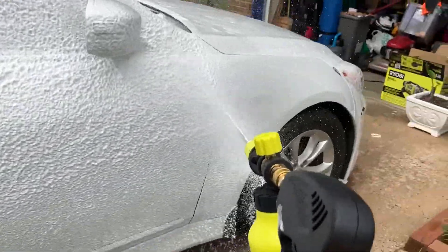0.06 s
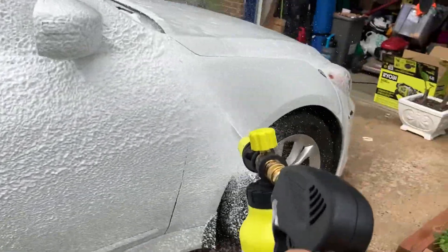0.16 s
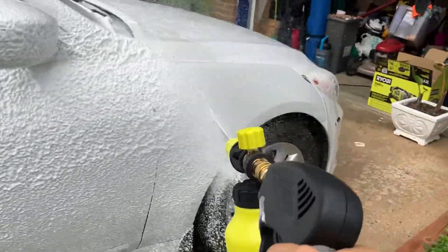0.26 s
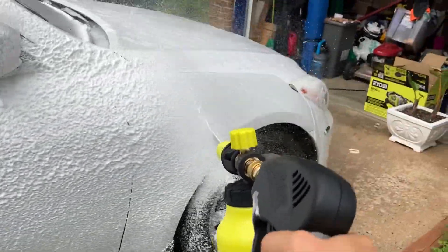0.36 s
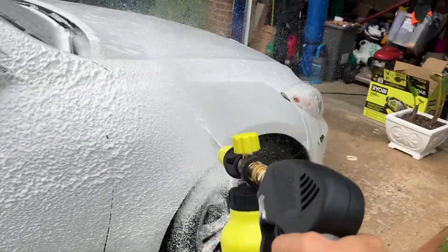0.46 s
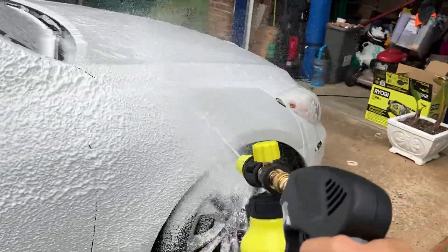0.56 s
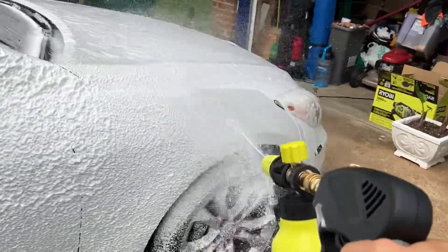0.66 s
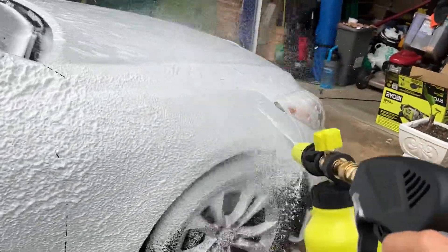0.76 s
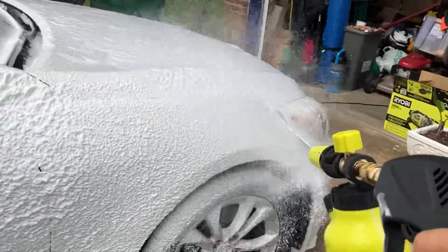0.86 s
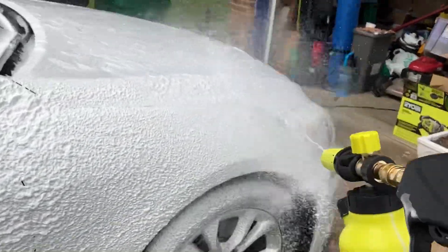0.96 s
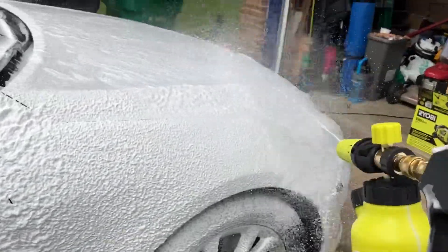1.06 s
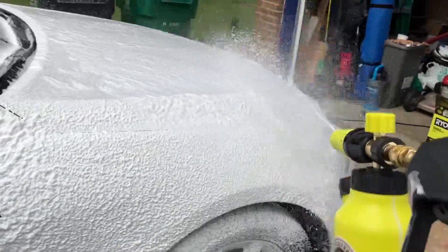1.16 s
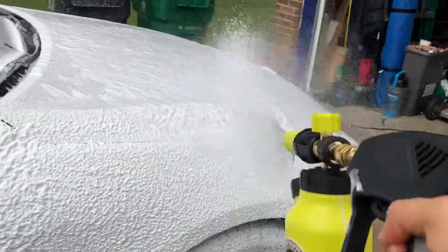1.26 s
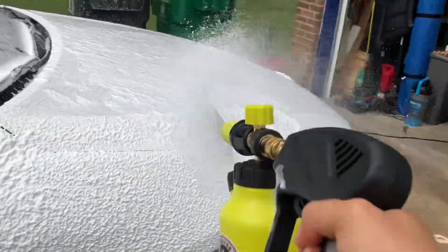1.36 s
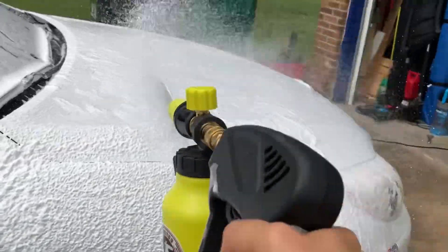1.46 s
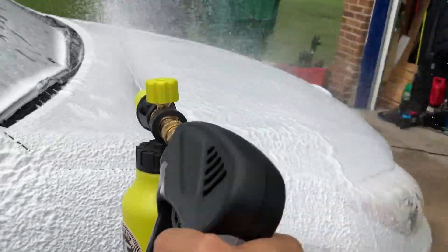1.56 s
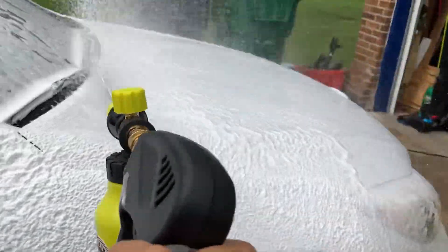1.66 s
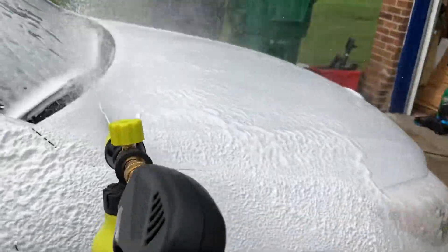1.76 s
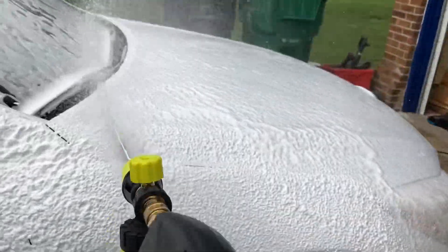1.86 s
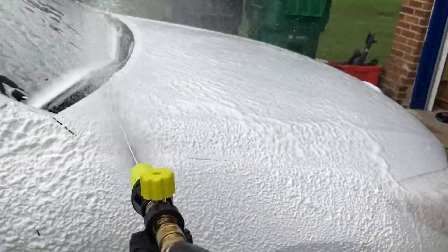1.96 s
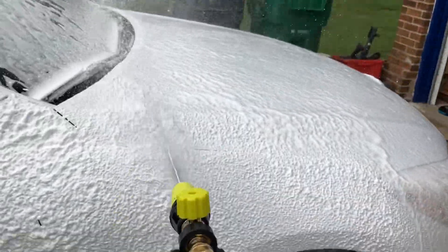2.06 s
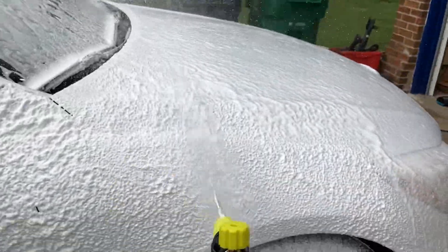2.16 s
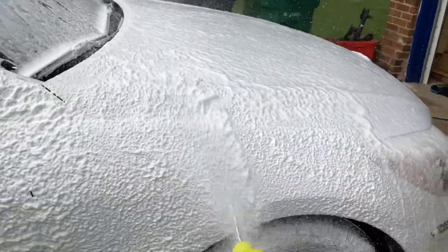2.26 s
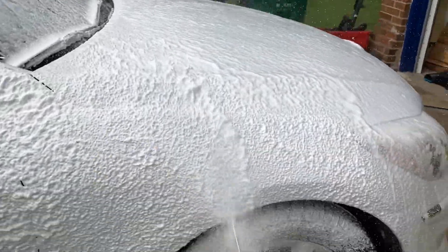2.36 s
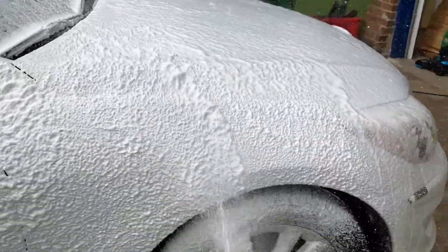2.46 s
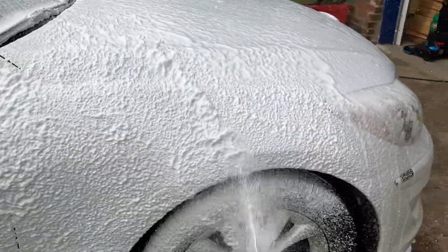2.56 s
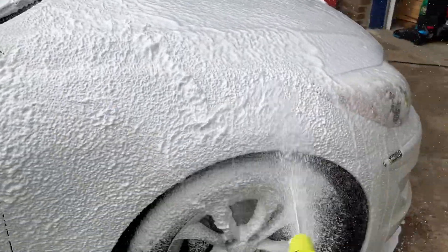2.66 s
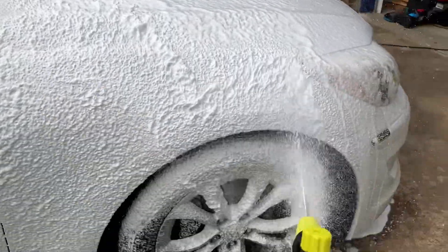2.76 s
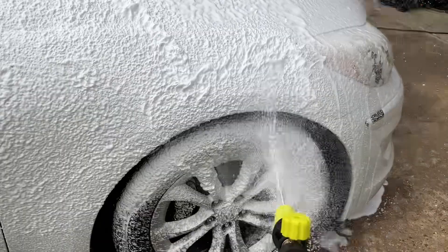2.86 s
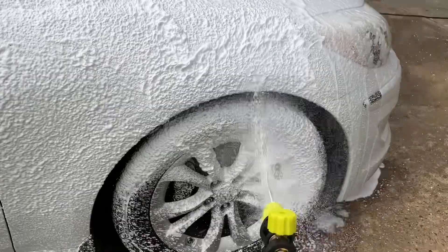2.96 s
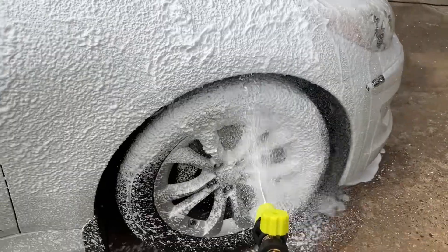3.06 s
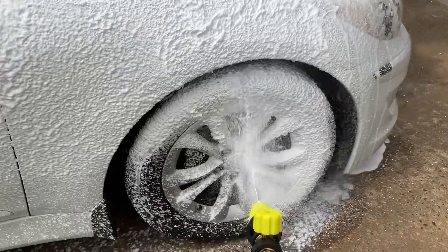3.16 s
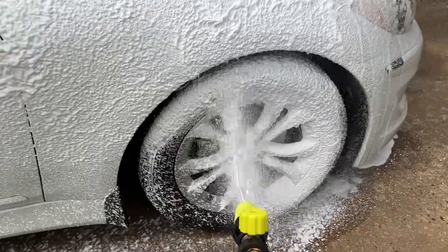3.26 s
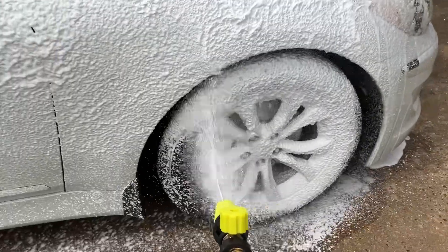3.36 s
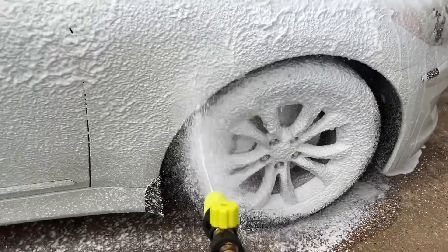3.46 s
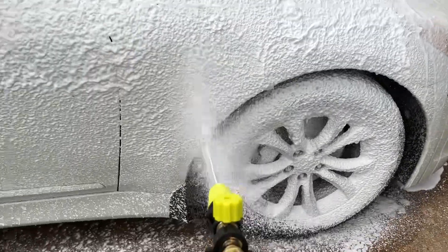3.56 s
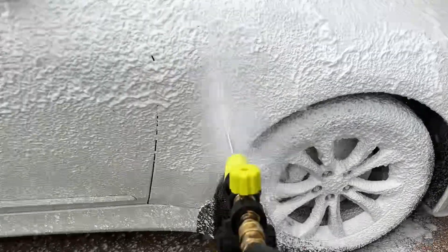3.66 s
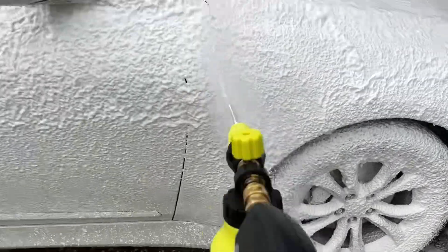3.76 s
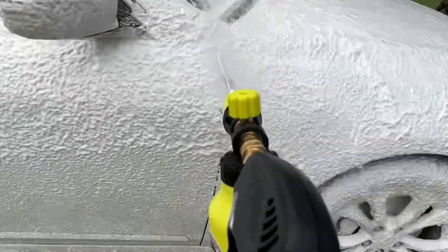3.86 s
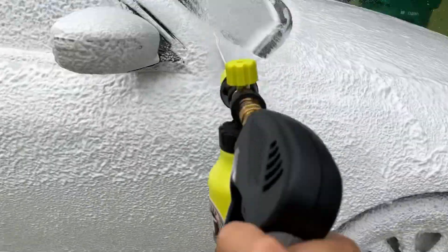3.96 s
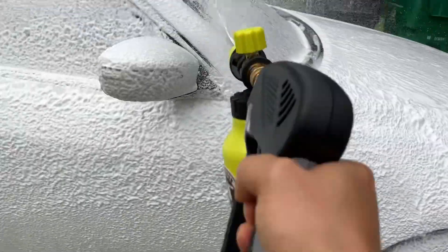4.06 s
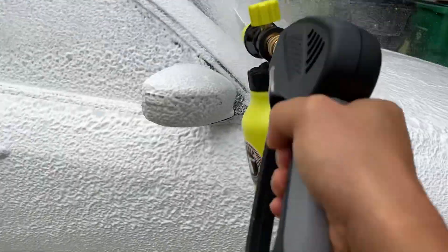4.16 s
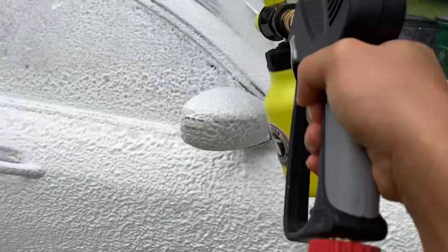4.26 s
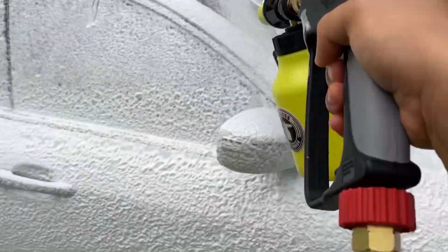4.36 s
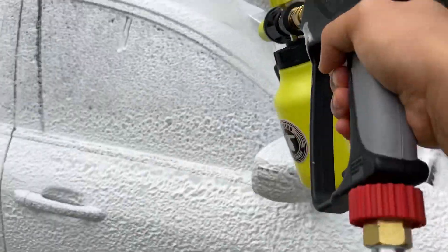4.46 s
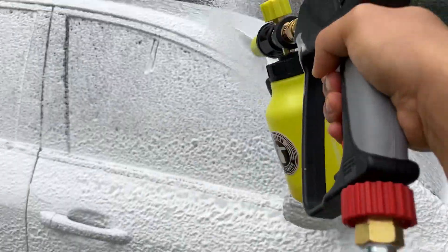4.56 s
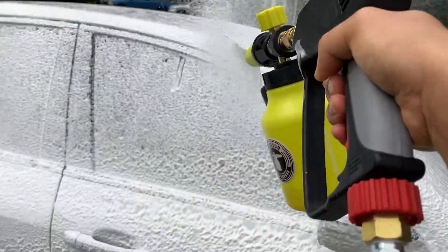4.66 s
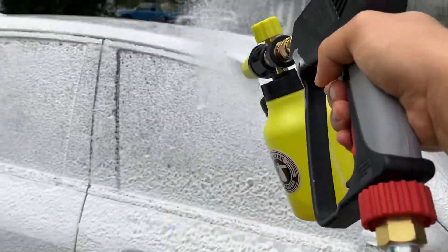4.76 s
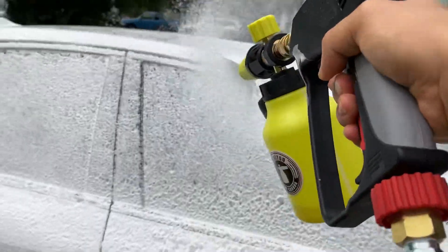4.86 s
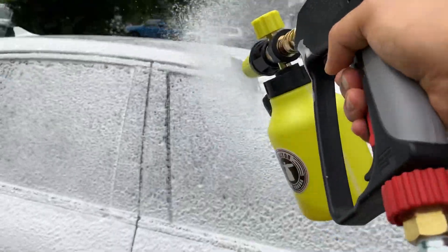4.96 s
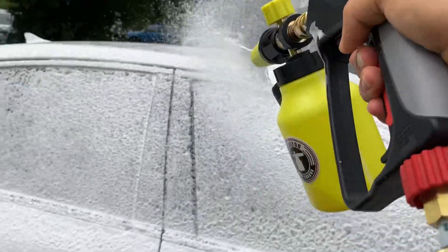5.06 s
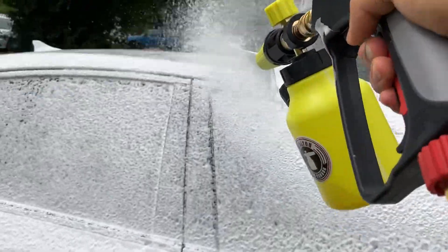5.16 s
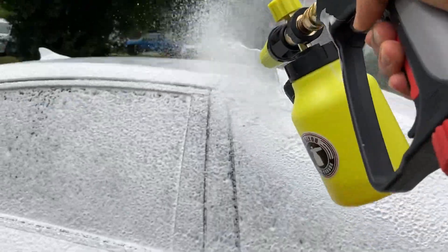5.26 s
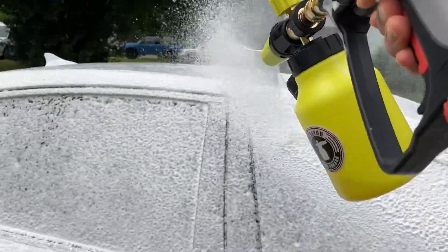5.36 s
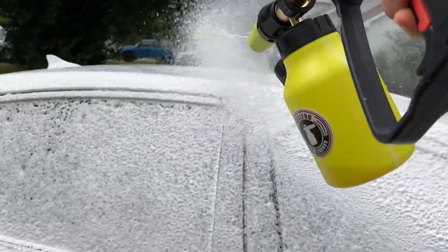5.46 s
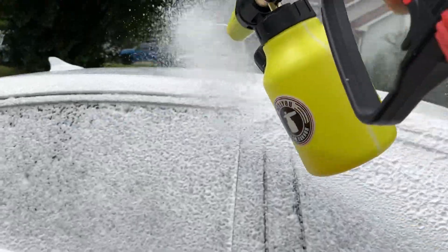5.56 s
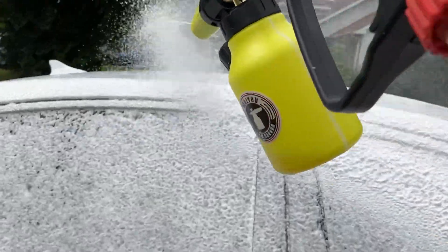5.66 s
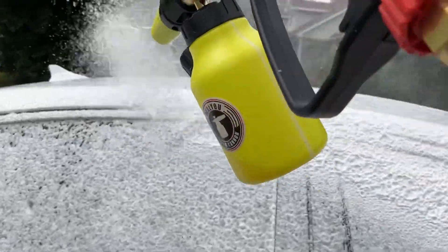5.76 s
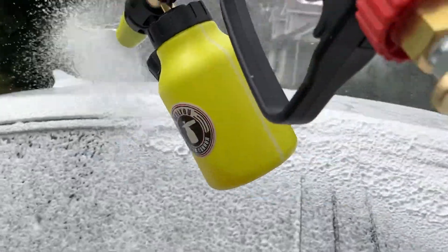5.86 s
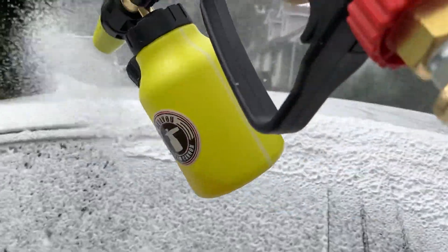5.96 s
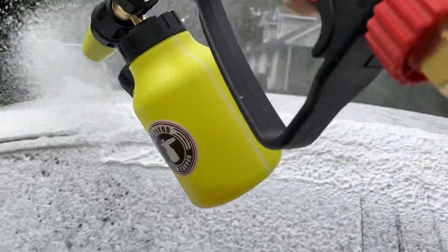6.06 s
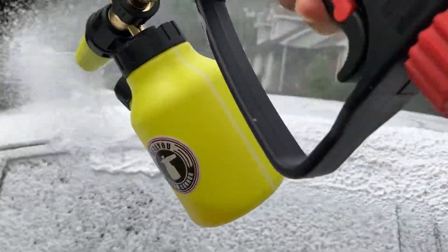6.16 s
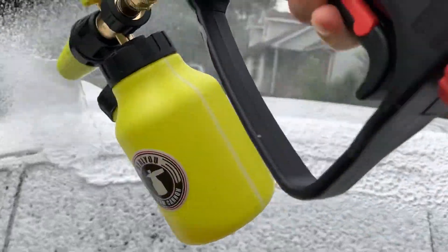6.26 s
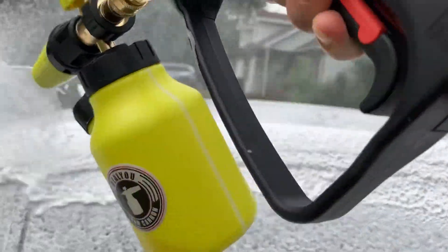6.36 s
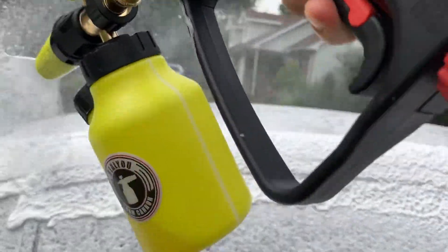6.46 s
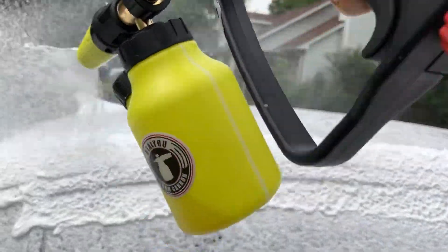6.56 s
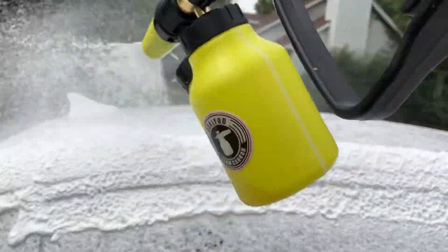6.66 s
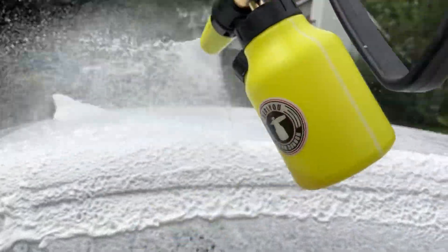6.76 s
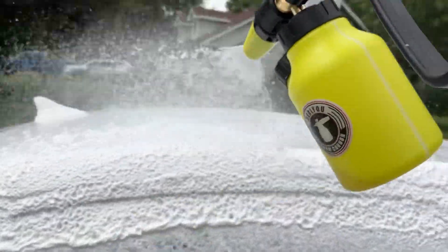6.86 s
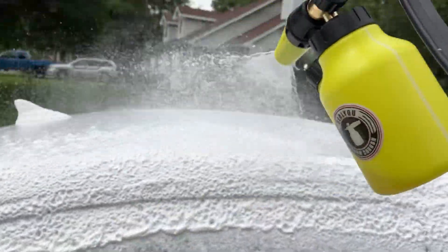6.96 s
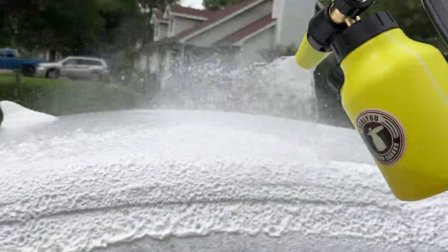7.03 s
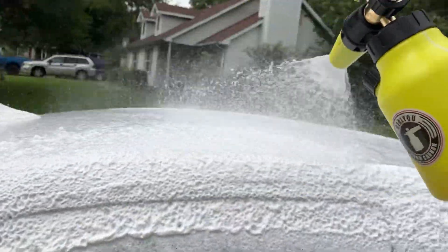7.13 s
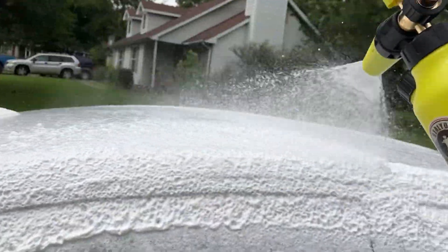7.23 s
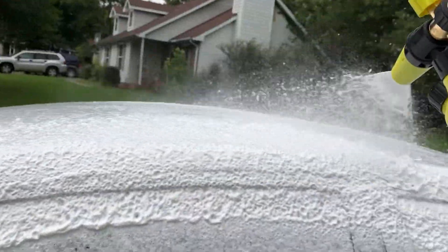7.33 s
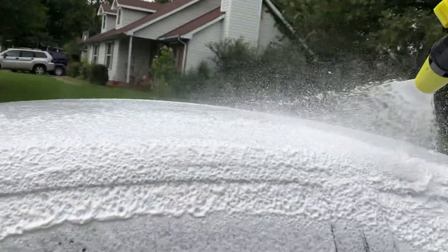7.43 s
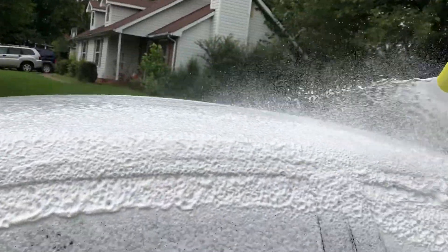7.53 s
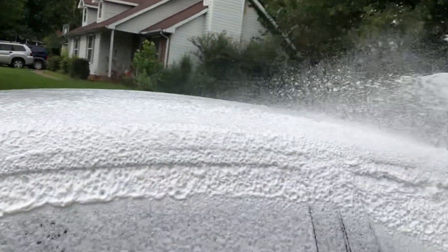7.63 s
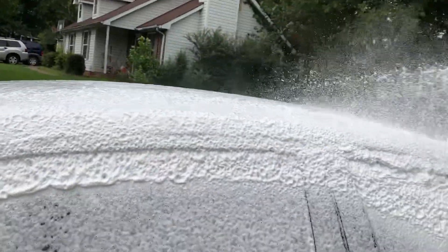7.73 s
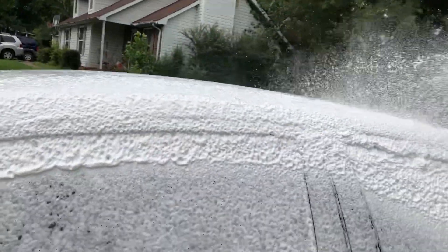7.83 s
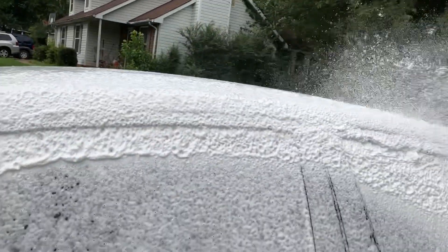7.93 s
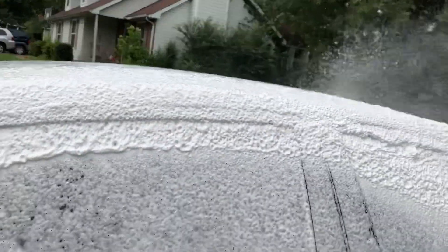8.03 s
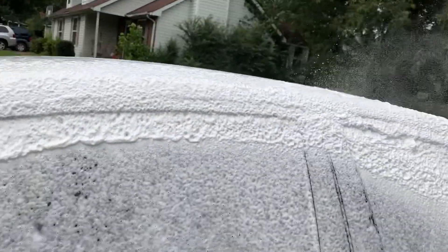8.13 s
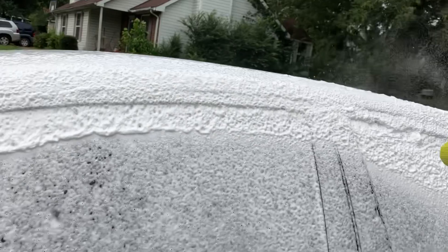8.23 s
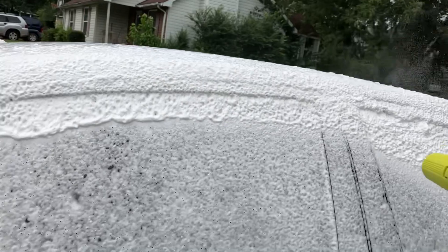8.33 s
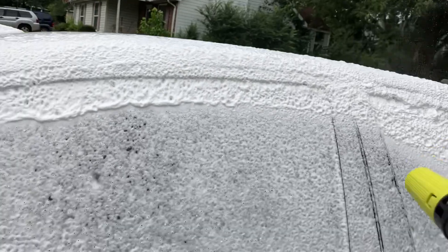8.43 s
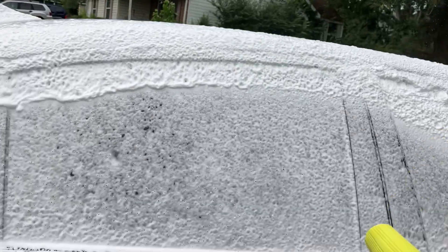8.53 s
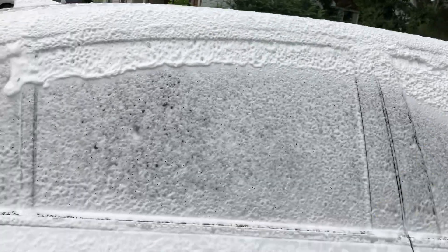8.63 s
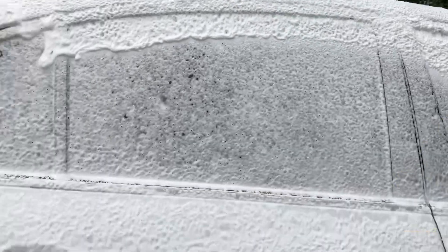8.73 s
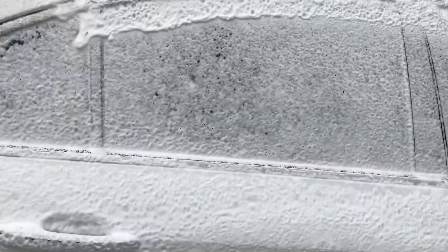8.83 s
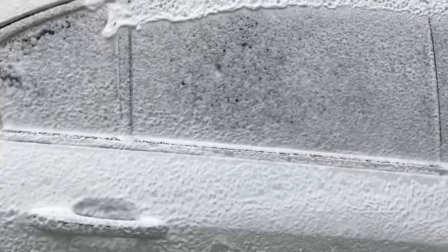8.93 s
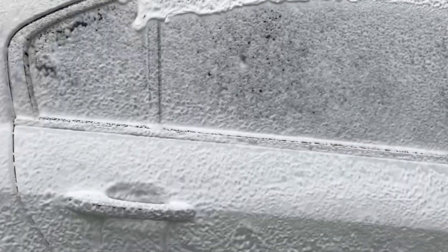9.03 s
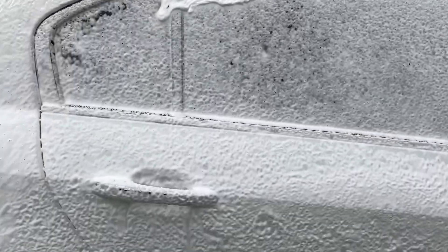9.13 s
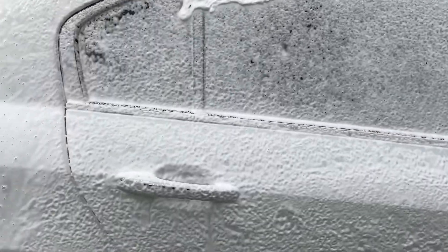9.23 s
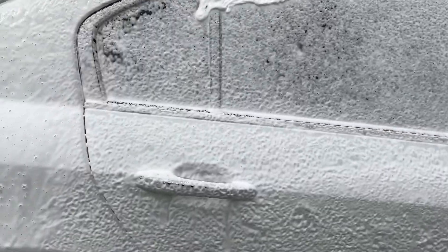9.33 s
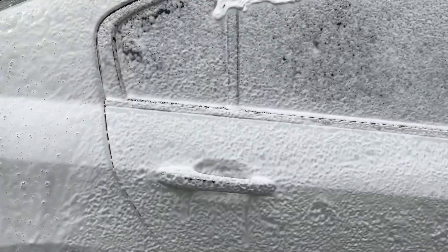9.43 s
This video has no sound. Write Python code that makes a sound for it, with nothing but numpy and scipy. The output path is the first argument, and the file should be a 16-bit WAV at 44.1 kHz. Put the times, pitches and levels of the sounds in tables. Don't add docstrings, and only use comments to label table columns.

```python
import sys
import numpy as np
from scipy import signal
from scipy.fft import rfft, irfft, next_fast_len
from scipy.io import wavfile
from scipy.ndimage import map_coordinates

SR = 44100
rng = np.random.default_rng(int(sys.argv[2]) if len(sys.argv) > 2 else 0)


def voltage_ratio(decibels):
    exponent = np.asarray(decibels, float) / 20
    return 10 ** exponent


def pcm_store(signal):
    levels = np.round(np.clip(np.atleast_2d(signal), -1, 1) * 32767)
    wavfile.write(sys.argv[1], SR, levels.astype(np.int16).T)


N = 418498
VALVE_S = 7.964


def unit(x):
    return x / np.sqrt(np.mean(x ** 2) + 1e-20)


def along(points, hz):
    f, v = np.transpose(points)
    return np.interp(np.log(hz + 1), np.log(f + 1), v)


def curves(rows):
    s, *cols = np.transpose(rows)
    return [np.interp(np.arange(N) / SR, s, c) for c in cols]


def wobble(rate):
    knots = rng.standard_normal(int(N * rate / SR) + 4)
    return map_coordinates(knots, [np.arange(N) * rate / SR], order=1)


def filtered(x, response):
    m = next_fast_len(N + 8192)
    return irfft(rfft(x, m) * response(np.fft.rfftfreq(m, 1 / SR)), m)[..., :N]


def rush(colour, size=1, channels=2):
    closed = [(colour[0][0] / 2, -90)] + colour + [(colour[-1][0] * 1.4, -90)]
    noise = size * rng.standard_normal((channels, N))
    return unit(filtered(noise, lambda hz: voltage_ratio(along(closed, hz))))


def droplets(share):
    return np.minimum(rng.exponential(size=N), 2.6) * (rng.random(N) < share)


def swells(rows, rise_s, fall_s):
    t = np.arange(N) / SR
    s, db = np.transpose(rows)[:2, :, None]
    return np.sum(voltage_ratio(db) * np.exp(-((t - s) / np.where(t < s, rise_s, fall_s)) ** 2), axis=0)


def yard():
    # (frequency [Hz], level [dB])
    street_colour = [(150, -19.5), (300, -2), (450, -7.5), (600, -7), (950, -6), (1500, -10), (2200, -6.5),
                     (3000, -14), (4200, -20.5), (9000, -34)]
    fizz_colour = [(2000, -20), (3600, -3), (5000, -2), (7500, -4), (10000, -4), (11000, -9), (16000, -11)]
    scuff_colour = [(600, -20), (1200, -2), (2000, 0), (3000, -2), (5000, -8), (9000, -12), (16000, -16)]
    # (time [s], level [dB], length [s])
    steps = [
        (8.1, -74, .2),
        (8.56, -67, .05),
        (8.7, -62, .07),
        (8.82, -55, .045),
        (8.98, -63, .07),
        (9.315, -56, .045),
        (9.47, -66, .08),
    ]
    since = np.maximum(np.arange(N) / SR - VALVE_S, 0)
    after_db = 3.5 * np.exp(-since / .06)
    street = voltage_ratio(-54 - 4.5 * since + 0.56 * after_db + 1.28 * wobble(10)) * rush(street_colour)
    bubbles = voltage_ratio(4 * droplets(share=.02))
    fizz = voltage_ratio(-62 - 5.5 * since + after_db + 1.2 * wobble(26)) * rush(fizz_colour, bubbles)
    length_s = np.transpose(steps)[2, :, None]
    shoes = swells(steps, length_s, .8 * length_s)
    grit = voltage_ratio(3 * droplets(share=.1))
    return street + fizz + shoes * voltage_ratio(2.5 * wobble(100)) * rush(scuff_colour, grit)


def wind():
    # (frequency [Hz], level [dB])
    buffet_colour = [(20, -24.5), (45, -3.5), (70, -1.5), (110, -6.5), (170, -10), (300, -15), (500, -28.5)]
    # (time [s], level [dB])
    breeze = [(0, -61), (2, -54), (4.6, -52), (5.3, -58.5), (7.2, -59), (7.9, -63.5), (9.49, -61.5)]
    # (time [s], level [dB])
    gusts = [(.08, -56), (.79, -58), (1.19, -57), (1.88, -54), (4.04, -53), (4.18, -46), (4.52, -49.5),
             (5.28, -54), (5.82, -49.5), (7.24, -49), (7.66, -47), (8.51, -58)]
    # (time [s], peak [dB], frequency [Hz], left over right [dB])
    bumps = [(1.295, -29.5, 191, 1), (4.027, -33, 70.0, 3.5), (4.146, -23, 75.4, -7.0),
             (4.224, -28, 78.1, 9.0), (4.488, -33, 137, 10), (4.72, -41, 296, 17), (5.003, -36, 195, -2.0),
             (5.269, -42, 256, 11.0), (5.8, -35, 111, 13), (6.678, -33, 196, 4), (7.229, -36, 120, 14),
             (7.599, -39, 250, 9), (8.04, -45, 86.1, -10), (8.129, -56, 145, 3), (8.17, -50, 135, 1.0),
             (8.5, -52, 61.9, -2.5), (8.741, -44, 218, -3.0), (9.412, -48, 234, -14)]
    lumps = voltage_ratio(3.1 * np.array([wobble(13), wobble(15)]))
    strength = voltage_ratio(curves(breeze)[0]) + swells(gusts, rise_s=0.064, fall_s=0.034)
    buffet = voltage_ratio(5.0) * strength * unit(lumps * rush(buffet_colour))
    out = np.pad(buffet, ((0, 0), (0, SR)))
    t = np.arange(SR // 8) / SR
    for s, db, hz, pan_db in bumps:
        phase = [[0], [rng.uniform(0, 3.2)]]
        envelope = voltage_ratio(-60 * t / 0.042) * (1 - np.exp(-t / 0.0019))
        push = np.sin(2 * np.pi * hz * t + phase) * envelope
        gain = voltage_ratio(db + 5.5 + pan_db / 2 * np.array([[1], [-1]]))
        out[:, round((s + .01) * SR):][:, :len(t)] += gain * push
    left, right = out[:, :N]
    mid, side = (left + right) / 2, voltage_ratio(3) * (left - right) / 2
    return np.array([mid + side, mid - side])


def motor():
    # (order, level [dB], time to emerge [s])
    commutator = [(1, 0, .25), (2, -8, .04), (3, -13, .2)]
    # (order, level [dB])
    shaft = [(1.05, -56), (2.03, -64)]
    # (frequency [Hz], level [dB])
    housing = [(480, -85), (750, -56), (1050, -51), (1450, -63), (2300, -54), (4500, -68), (5600, -45),
               (10300, -52)]
    coast_hz, sag_hz_per_s = 3460, 1300
    brake_s, brake_tau_s = 8.55, .215
    bars = 11
    t = np.arange(N) / SR
    coast = coast_hz - sag_hz_per_s * (np.clip(t, VALVE_S, brake_s) - VALVE_S)
    hz = coast * np.exp(-np.maximum(t - brake_s, 0) / brake_tau_s)
    closed = [(250, -130)] + housing
    fading = (hz / hz[round(brake_s * SR)]).clip(0, 1) ** 6

    def emerge(s):
        return np.clip((t - VALVE_S) / s, 0, 1) ** 2

    paths = []
    for _ in range(2):
        turn = 2 * np.pi * np.cumsum(hz * (1 + .011 * wobble(700))) / SR
        whine, rattle = 0, 0
        for k, db, s in commutator:
            whine = whine + emerge(s) * voltage_ratio(db + along(closed, k * hz) + 2.5 * wobble(90)) * np.sin(k * turn)
        for k, db in shaft:
            rattle = rattle + voltage_ratio(db + 4 * wobble(25)) * np.sin(k * turn / bars)
        paths.append(whine + emerge(.33) * fading * rattle)
    return np.array(paths)


def clicks():
    # (time [s], peak [dB], ring [Hz], t60 [s])
    snaps = [
        (7.9427, -15, 3000, .014),
        (7.9432, -17, 5500, .014),
        (7.939, -23, 850, .04),
        (7.951, -18, 3000, .012),
        (8.0146, -35, 4500, .007),
        (8.0415, -29, 12000, .0009),
        (8.058, -46, 11000, .003),
        (8.715, -37, 3400, .005),
        (8.8996, -44, 2900, .015),
        (8.912, -49, 3300, .01),
    ]
    out, t = np.zeros(N + SR), np.arange(SR // 8) / SR
    for s, db, hz, t60 in snaps:
        ring = np.sin(2 * np.pi * hz * t) * (1 + .5 * rng.standard_normal(len(t)))
        out[round(s * SR):][:len(t)] += voltage_ratio(db - 60 * t / t60) * (1 - np.exp(-t * hz)) * ring
    return out[:N]


def spray():
    # (frequency [Hz], level [dB])
    roar_colour = [(300, -13.5), (420, -6), (550, -5), (750, -4), (950, -2.5), (1200, -2.5), (1450, -7),
                   (1900, -9.5), (2600, -31.5)]
    splash_colour = [(800, -30), (1150, -12), (1450, -3), (1800, -1), (2200, 1), (2600, 0), (3400, 0),
                     (4000, -3), (4800, -12), (6500, -30)]
    spatter_colour = [(2500, -30), (3350, -12), (4000, -3), (4800, 0), (6200, 1.5), (7200, 1.5), (8000, -1),
                      (9200, -10), (12000, -30)]
    hiss_colour = [(5500, -30), (7000, -12), (8000, -3), (9000, -.5), (10300, .5), (12500, -1),
                   (14000, -2.5), (16000, -4)]
    sheet_colour = [(120, -12), (200, -6), (300, -1.5), (400, 0), (500, -5), (700, -25)]
    # (time [s], level [dB])
    nozzle = [(0.0, -27), (0.66, -25.5), (1.23, -32.5), (1.34, -27), (1.63, -38.5), (1.85, -24.5),
              (2.25, -22.5), (3.24, -28.5), (3.8, -26.5), (4.28, -41.5), (4.44, -35.5), (6.16, -25),
              (6.63, -26.5), (6.67, -30.5), (7.31, -31), (7.42, -27.5), (7.53, -31), (7.93, -38)]
    # (time [s], strength [dB], hardness of the surface [dB])
    impact = [(0.0, -28, 0.5), (0.02, -31, 1), (0.2, -32, 0), (0.24, -35, 2), (0.66, -39, 0.5),
              (1.79, -35.5, 2), (2.05, -29, -0.5), (2.58, -31, 1.5), (2.6, -33.5, -0.5), (3.51, -35, 1),
              (3.71, -31.5, -1), (4.0, -33.5, -2), (4.15, -41.5, 2), (5.41, -36, -5.5), (5.67, -37.5, -2.5),
              (6.63, -35.5, -0.5), (6.65, -40, 1), (7.93, -35, 5.5)]
    # (time [s], distance [m])
    reach = [(0, 0.55), (2.1, 0.46), (2.6, 0.74), (3.4, 0.66), (3.7, 0.65), (4.4, 0.67), (5.6, 0.47),
             (7.9, 0.44)]
    # (time [s], boom [dB])
    booms = [
        (4.07, -43),
        (4.16, -34),
        (4.52, -45),
        (4.74, -41),
        (7.39, -46),
        (7.62, -42),
        (7.945, -44),
    ]
    (nozzle_db,), (impact_db, hard_db), (metres,) = curves(nozzle), curves(impact), curves(reach)
    from_nozzle = 0.53
    spatter_db = 5 + hard_db + from_nozzle * nozzle_db + (1 - from_nozzle) * impact_db
    drum = voltage_ratio(-33 + 0.37 * nozzle_db) + swells(booms, rise_s=.02, fall_s=.025)
    flow = .5 * wobble(9) + .5 * wobble(25) + 0.78 * wobble(150)
    hits = droplets(share=.08)
    jet = drum * voltage_ratio(0.59 * wobble(12)) * rush(sheet_colour)
    jet += voltage_ratio(-40.5 + 0.22 * flow + 0.63 * wobble(12)) / metres * rush(roar_colour, voltage_ratio(2 * hits))
    jet += voltage_ratio(4 + impact_db + 1.3 * flow + 0.35 * wobble(14)) * rush(splash_colour, voltage_ratio(3.2 * hits))
    jet += voltage_ratio(spatter_db + flow + .6 * wobble(14)) * rush(spatter_colour, voltage_ratio(4 * hits))
    jet += voltage_ratio(3.5 + nozzle_db + 1.22 * flow + 0.16 * wobble(14)) * rush(hiss_colour, voltage_ratio(4.4 * hits))
    close_db_per_s = 850
    return jet * voltage_ratio(-close_db_per_s * np.maximum(np.arange(N) / SR - VALVE_S, 0))


def echoed(x):
    # (time [s], delay [ms], strength, negative = inverted)
    panel = [(0, 1.04, .43), (1.6, 1.08, 0.3), (2, 1.03, 0.44), (2.4, 0.8, 0.3), (3.5, 0.74, 0.45),
             (3.8, 1.09, 0.38), (4, 1.16, 0.32), (5.2, 1.14, 0.41), (5.6, 1.05, .2), (6.4, 1, 0.13),
             (6.9, 1.13, .17), (7.2, 1.12, .4), (8, 1.22, 0.31)]
    kerb = [(2.4, 2.35, .02), (2.7, 2.4, .18), (3.4, 2.6, .15), (3.8, 3.2, .12), (4.1, 3.3, .27),
            (4.6, 3.18, .26), (5.2, 3, .2), (5.4, 2.9, .02)]
    sill = [(3.85, 2.9, -.01), (4.05, 2.88, -.29), (5, 2.76, -.28), (5.25, 2.5, -.05), (5.45, 1.8, -.05),
            (5.6, 1.75, -.2), (6.4, 1.55, -.15), (6.7, 1.5, -.02)]
    ground = [(0, 1.55, -0.19), (2.5, 1.62, -0.31), (2.9, 1.42, 0.26), (3.5, 1.41, .22), (4, 1.3, 0.17),
              (5.3, 1.48, 0.2), (5.8, 1.36, .36), (6.7, 1.404, 0.24), (8, 1.41, 0.31)]
    hand = [(0, 0.47, -0.19), (2.2, 0.5, -0.13), (4.5, 0.59, -0.14), (5.6, 0.56, -0.16), (6.1, .42, -0.17),
            (6.6, .41, -0.27), (6.8, 0.68, -0.23), (7.1, 0.67, -0.18), (7.4, 0.53, -0.068), (8, 0.4, -0.14)]
    out, now = x, np.arange(N)
    for paths, dull_hz in (((panel, kerb, sill), 3500), ((ground, hand), 7000)):
        dull = filtered(x, lambda hz: 1 / (1 + (hz / dull_hz) ** 2) / (1 + (400 / (hz + 1)) ** 4))
        for ms, strength in map(curves, paths):
            late = now - ms * SR / 1000
            out = out + strength * np.array([np.interp(late, now, c) for c in dull])
    return out


def driveway(x):
    # (frequency [Hz], t60 [s])
    decay = [(300, 0.23), (2000, 0.2), (10000, 0.051)]
    hz, t, z = signal.stft(rng.standard_normal((2, SR // 2)), SR, nperseg=256)
    tail = signal.istft(z * voltage_ratio(-60 * t / along(decay, hz)[:, None]), SR, nperseg=256)[1]
    return signal.fftconvolve(x[None], tail / np.linalg.norm(tail[0]), axes=1)[:, :N]


def ports(pair, scatter=1):
    # (frequency [Hz], left leads by [rad])
    lead = [(200, .2), (550, .6), (1150, .22), (1700, .15), (2200, .6), (3250, 2.2), (3850, 3.1),
            (4300, 3.25), (4800, 3.2), (7000, 3.05), (8100, 2.4), (10300, 1.1), (12200, 0), (14300, -.1),
            (15600, -.9)]
    # (frequency [Hz], likeness [0-1])
    alike = [(170, .3), (340, .9), (550, .93), (1500, .98), (2200, .8), (3600, .75), (4000, .995),
             (4480, .5), (4900, .97), (7200, .965), (9300, .76), (11300, .93), (12300, .99), (14200, .96),
             (15700, .72)]

    def mix(hz):
        turn = np.arccos(np.clip(along(alike, hz), 0, 1) ** scatter) / 2
        shift = np.exp(1j * along(lead, hz) / 2 * [[[1]], [[-1]]])
        return shift * [[np.cos(turn), s * np.sin(turn)] for s in (1, -1)]

    return filtered(pair, mix).sum(axis=1)


def swung(pair):
    # (time [s], share [0-1])
    bearing = [(0, .2), (.55, .15), (.7, 0), (1.3, .05), (1.6, .2), (2.1, 0), (2.6, 0), (2.9, .14),
               (4.6, .14), (4.8, 0), (5.6, 0), (6.2, .08), (7.1, .25), (7.3, .95), (9.49, .95)]
    # (frequency [Hz], phase [rad])
    aside_lead = [(2400, 0), (3000, -.5), (3400, -1.3), (3700, -1.9), (3950, -4.2), (4350, -4.5),
                  (4900, -5.9), (5300, -2 * np.pi)]
    share = curves(bearing)[0].clip(0, 1)
    aside = filtered(pair[0], lambda hz: np.exp(1j * along(aside_lead, hz)))
    return np.array([(1 - share) * pair[0] + share * aside, pair[1]])


def scene():
    jet = voltage_ratio(-.8) * echoed(spray())
    snaps, pump = clicks(), motor()
    room = driveway(voltage_ratio(-25) * jet[0] + voltage_ratio(-20) * snaps + voltage_ratio(-4) * pump[0])
    near = swung(ports(jet + snaps))
    far = ports(pump + room + yard(), scatter=9)
    return near + far + wind()


def top_cut(x):
    return signal.sosfilt(signal.butter(12, 15970, fs=SR, output="sos"), x)


def record(dry):
    limited = filtered(dry, lambda hz: (hz < 15950) / (1 + (30 / (hz + 1)) ** 4))
    return top_cut(limited)


dry = scene()
out = record(dry)
pcm_store(out)
```